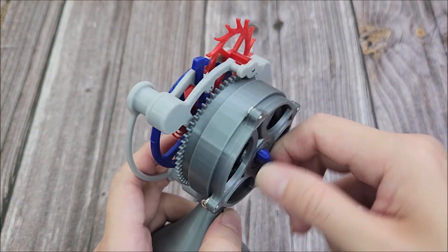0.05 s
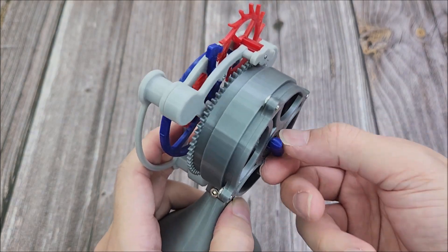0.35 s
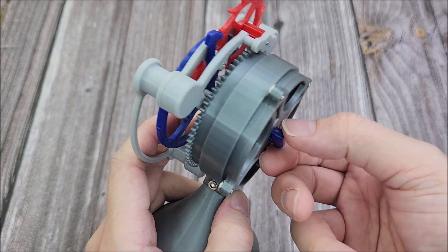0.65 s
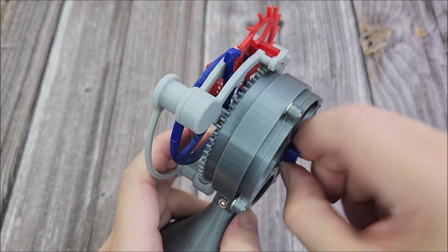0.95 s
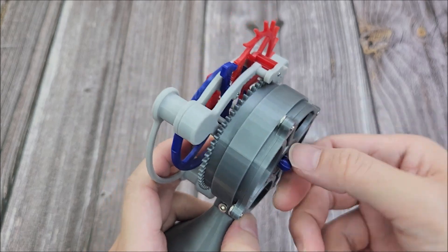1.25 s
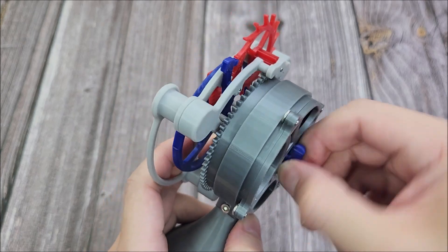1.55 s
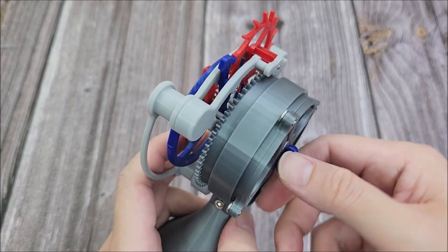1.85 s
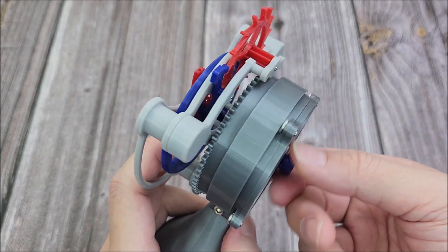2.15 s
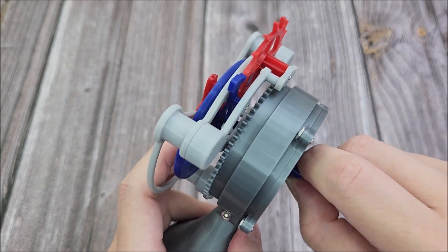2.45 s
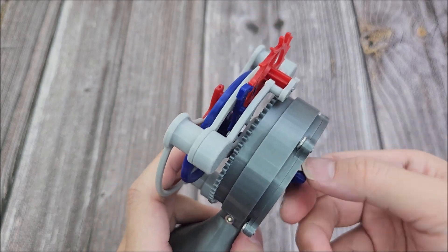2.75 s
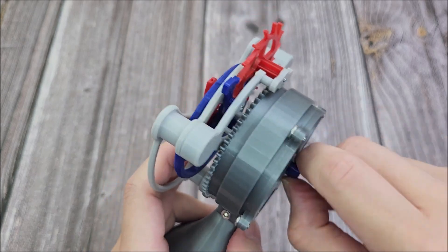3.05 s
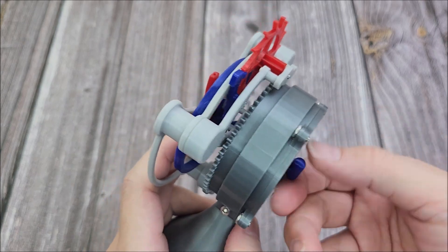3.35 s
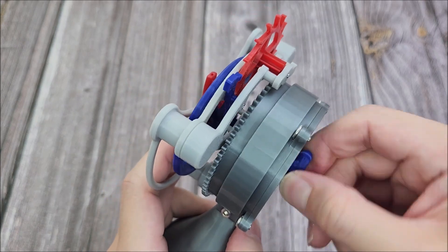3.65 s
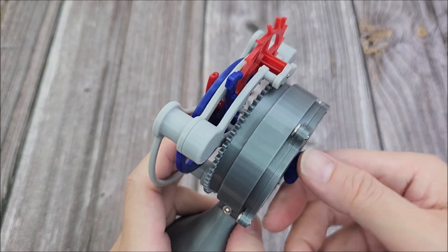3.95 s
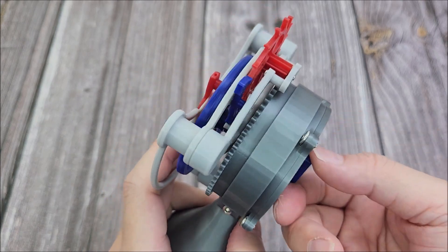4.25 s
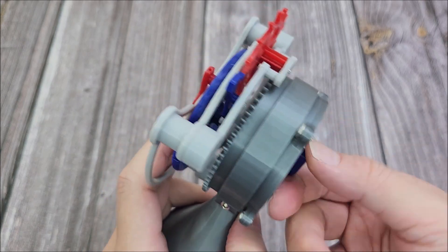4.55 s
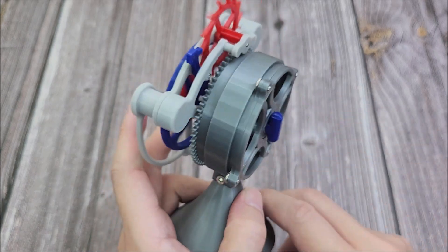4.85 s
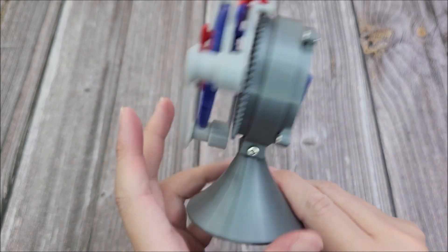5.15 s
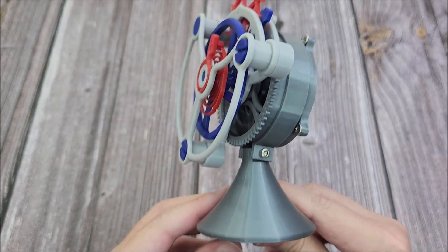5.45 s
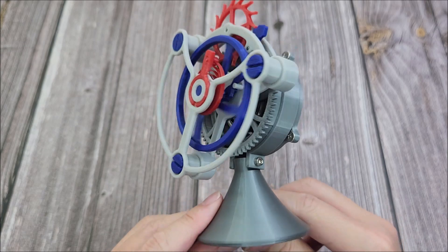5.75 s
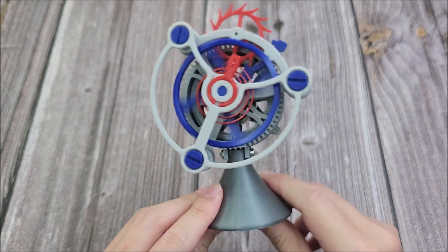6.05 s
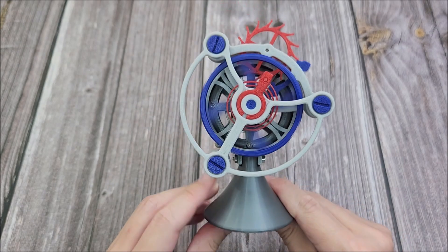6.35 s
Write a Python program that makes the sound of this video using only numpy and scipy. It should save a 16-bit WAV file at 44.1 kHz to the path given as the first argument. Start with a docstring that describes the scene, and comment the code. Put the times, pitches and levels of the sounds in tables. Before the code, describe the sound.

A small plastic clockwork model is wound in rasping ratchet bursts, then clicks free and ticks quickly and lightly in a quiet room.

```python
"""A quiet room, where a plastic model of a watch movement is held close and wound by hand.
Six pushes of the key drag a pawl over the ratchet teeth, amid finger rubs and small taps in the frame.
The key is let go and the pawl seats; the escapement starts with a hollow knock, then ticks four times
a second. Each contact is a scrape, snap and chatter of noise, coloured by the resonances of its part."""
import sys
import numpy as np
from scipy import signal
from scipy.fft import rfft, irfft, next_fast_len
from scipy.io import wavfile
from scipy.ndimage import uniform_filter1d, map_coordinates

SR = 44100
rng = np.random.default_rng(int(sys.argv[2]) if len(sys.argv) > 2 else 0)


def master_out(mix):
    """Clip the mix to full scale and print it as 16-bit PCM to the path in sys.argv[1]."""
    frames = np.transpose(np.atleast_2d(mix))
    ceiling = np.clip(frames, -1, 1)
    pcm = np.round(ceiling * 32767).astype(np.int16)
    wavfile.write(sys.argv[1], SR, pcm)


N = 281603
CUTOFF_HZ = 15900
FFT_SIZE = next_fast_len(N + SR, real=True)
HZ = np.maximum(np.arange(FFT_SIZE // 2 + 1) * SR / FFT_SIZE, 1)

# broad response of the ratchet wheel (frequency [Hz], gain [dB])
WHEEL_RESPONSE = [(50, -15), (110, -11), (250, -16.5), (700, -15.5), (1200, -17.5), (1700, -3), (2700, -6),
                  (3700, -3), (4700, 3), (6400, -1.5), (7600, 3.5), (12500, 3.5), (13900, 1), (15700, 2)]
# resonances of wheel and frame (frequency [Hz], width [Hz], gain [dB])
WHEEL_RESONANCES = [(1770, 50, -1), (2202, 250, 4.5), (2394, 63, 13), (2980, 41, 7), (3270, 180, 4),
                    (4640, 560, -8.5), (7300, 300, -3.5), (8840, 140, -8.5), (10170, 91, -4.5),
                    (11560, 100, -6), (15110, 220, -10.5)]
FRAME_RESONANCES = [(2253, 230, 14), (2820, 250, -1.5), (4200, 240, 2.5), (5730, 100, -6)]
# key travel, one list per push (time [s], teeth passed [count])
KEY_PUSHES = [
    [(.8498, 0), (.8773, 1), (.9144, 2), (.9443, 3), (.9627, 4), (1.0188, 9), (1.0478, 11), (1.0731, 12)],
    [(1.5164, 0), (1.5862, 2), (1.6052, 3), (1.6622, 8)],
    [(2.2368, 0), (2.2458, 1), (2.2587, 2), (2.2922, 3)],
    [(2.3591, 0), (2.4042, 3), (2.4307, 4), (2.4541, 5), (2.4918, 8), (2.5119, 9)],
    [(2.9121, 0), (2.9830, 2), (3.0068, 3), (3.0242, 4), (3.0985, 10)],
    [(3.6113, 0), (3.6818, 3), (3.7180, 5), (3.7372, 6), (3.8012, 9)],
]


def from_db(db):
    """Decibels to gain."""
    return 10 ** (np.asarray(db) / 20)


def at_hz(points, hz=HZ):
    """Read a table on a log-frequency axis."""
    points_hz, values = np.transpose(points)
    return np.interp(np.log(hz), np.log(points_hz), values)


def unit_energy(x):
    """Scale each channel to energy 1."""
    return x / np.sqrt(np.sum(x ** 2, axis=-1, keepdims=True) + 1e-20)


def add(out, start_s, piece):
    """Mix a piece in from start_s."""
    at = int(round(start_s * SR))
    piece = piece[:, max(-at, 0):max(N - at, 0)]
    out[:, max(at, 0):max(at, 0) + piece.shape[1]] += piece


def body(force, broad, modes):
    """Spectrum of a driven part: causal broad response times resonances, mean power gain 1."""
    cepstrum = irfft(np.log(from_db(at_hz(broad))), FFT_SIZE)
    cepstrum[1:FFT_SIZE // 2] *= 2
    cepstrum[FFT_SIZE // 2 + 1:] = 0
    peaks = 1 + sum(from_db(db) / (1 + 2j * (HZ - hz) / width_hz) for hz, width_hz, db in modes)
    response = np.exp(rfft(cepstrum)) * peaks
    rms_gain = np.sqrt(np.mean(np.abs(response[HZ < CUTOFF_HZ]) ** 2))
    return rfft(force, FFT_SIZE) * response / rms_gain


def spot_colour(force, depth_db=2.4, width_hz=600, corner_hz=2500):
    """Each contact spot favours other pitches: a smooth random ripple, deepest in the treble."""
    hz = np.arange(force.shape[1] // 2 + 1) * SR / force.shape[1]
    ripple = map_coordinates(rng.standard_normal(256), [hz / width_hz], order=3, mode="mirror")
    ripple_db = depth_db * ripple * hz / np.hypot(hz, corner_hz)
    return irfft(rfft(force) * from_db(ripple_db), force.shape[1])


def contacts(rows, gain_db, scrape_share, snap_share, chatter_s, chatter_db, split_hz):
    """Mid/side force: each contact scrapes up to a snap, then loose parts chatter."""
    out = np.zeros((2, N))
    lead_s, grit_db = 0.01, 2.5
    t = np.arange(next_fast_len(SR // 16, real=True)) / SR - lead_s
    before, after = np.minimum(t, 0), np.maximum(t, 0)
    lowpass = signal.butter(1, split_hz, fs=SR)
    for time_s, level_db, bright_db, pan_db, length_ms in rows:
        length_s = length_ms / 1000
        grit = uniform_filter1d(rng.standard_normal(len(t)), size=16)
        scrape = rng.standard_normal((2, len(t))) * np.exp(before / (scrape_share * length_s))
        scrape *= from_db(grit_db * grit / grit.std())
        snap = spot_colour(scrape * np.exp(-after / (snap_share * length_s)))
        chatter = from_db(chatter_db) * scrape * np.exp(-after / chatter_s)
        force = unit_energy(snap + chatter)
        # a harder contact trades bass for treble
        bass = signal.lfilter(*lowpass, force)
        force = bass * from_db(-bright_db / 2) + (force - bass) * from_db(bright_db / 2)
        # mid/side leakage pans it; positive is left
        force = force + np.tanh(np.log(from_db(pan_db / 2))) * force[::-1]
        add(out, time_s - lead_s, from_db(level_db + gain_db) * force)
    return out


def alike(rows, pan_db, length_ms):
    """Give contacts a common pan and length."""
    return [(*row, pan_db, length_ms) for row in rows]


def left_right(pair, correlation):
    """Blend unrelated mid and side spectra into left and right of a given correlation."""
    likeness = at_hz(correlation)
    mid = np.sqrt((1 + likeness) / 2) * pair[0]
    side = np.sqrt((1 - likeness) / 2) * pair[1]
    return np.array([mid + side, mid - side])


def still_room(rms_db=-58.5):
    """Low rumble and faint hiss of the room."""
    spectrum = [(20, -2), (34, 4), (50, -2), (115, -7.5), (170, -13), (290, -7), (450, -12), (800, -16),
                (2200, -22), (3400, -31.5), (4200, -30), (7300, -33), (10300, -42.5), (16000, -41)]  # room noise (frequency [Hz], level [dB])
    correlation = [(30, 1), (80, .88), (200, 0.8), (600, .45), (1500, 0.1), (8000, 0)]  # left with right (frequency [Hz], correlation [0-1])
    noise = left_right(rfft(rng.standard_normal((2, FFT_SIZE))), correlation)
    air = irfft(noise * from_db(at_hz(spectrum)), FFT_SIZE)[:, :N]
    return from_db(rms_db) * np.sqrt(N) * unit_energy(air)


def fading_turn(level_db=-51, t60_s=0.36):
    """The room still rings from a turn of the key just before the scene opens."""
    fade = from_db(level_db - 60 * np.arange(N) / SR / t60_s)
    return body(fade * rng.standard_normal((2, N)), WHEEL_RESPONSE, WHEEL_RESONANCES)


def frame_taps():
    """Small taps: handling, the pawl taking up or scraping a tooth, the lead-in to the first beat."""
    taps = [(0.0329, -36, -1), (0.7778, -43.5, 6), (1.7763, -37, 1.5), (2.2206, -32, 3),
            (2.2851, -24.5, 3.5), (2.8152, -43.5, -9), (3.1751, -36.5, -3.5), (3.34, -36, -4),
            (3.4994, -43.5, -0.5), (3.5645, -45.5, 1.5), (3.8803, -42.5, 18), (3.9081, -36, -8.5),
            (4.4992, -35, -7), (4.5855, -43.5, 10), (4.6503, -39, -15), (4.8181, -43, 8)]  # (time [s], level [dB], brightness [dB])
    response = [(100, -6), (1200, -16.5), (2400, -5), (5000, 4.5), (8000, 2), (12000, -5.5), (16000, -0.5)]  # frame (frequency [Hz], gain [dB])
    force = contacts(alike(taps, pan_db=0.5, length_ms=1.8), gain_db=14.5, scrape_share=0.23,
                     snap_share=0.85, chatter_s=0.006, chatter_db=-23.5, split_hz=4000)
    return body(force, response, FRAME_RESONANCES)


def finger_rubs(gain_db=-5.5, grains_per_s=3600, spread_db=1.5):
    """Skin catches on ridges of the plastic: swells of tiny uneven slips."""
    rubs = [(0.444, 0.04, -53.5), (0.498, .045, -39), (0.541, 0.042, -55), (1.784, 0.019, -49.5),
            (2.027, 0.0634, -50), (2.652, 0.022, -53.5), (2.731, 0.053, -56), (3.468, 0.055, -48),
            (3.88, 0.059, -45.5), (3.998, 0.062, -58.5)]  # (time [s], length [s], level [dB])
    response = [(100, -6), (1200, -3.5), (2400, -4), (3500, -0.5), (5800, -0.5), (8000, -4), (16000, -15)]  # skin on plastic (frequency [Hz], gain [dB])
    take_up_s, take_up_db = 0.025, -52.5  # a rub leads into every push
    take_ups = [(push[0][0] - take_up_s, take_up_s, take_up_db) for push in KEY_PUSHES]
    force, longest = np.zeros((2, N)), SR // 8
    for time_s, length_s, level_db in rubs + take_ups:
        slipping = rng.random(longest) < grains_per_s / SR
        sizes = from_db(spread_db * rng.standard_normal(longest))
        grains = slipping * sizes * rng.standard_normal((2, longest))
        n = int(length_s * SR)
        swell = unit_energy(grains[:, :n] * np.sqrt(np.hanning(n)))
        add(force, time_s, from_db(level_db + gain_db) * np.sqrt(n) * swell)
    return body(force, response, FRAME_RESONANCES)


def key_creak():
    """The key sticks and slips under the fingers when first gripped."""
    slips = [(.4915, -38.5, 0.5, 2, 1), (.4965, -37, -9.5, -7, 0.96), (.5003, -29.5, -2.5, 1.5, 0.71),
             (.5062, -28, -4.5, 5.5, 0.38)]  # (time [s], level [dB], brightness [dB], pan [dB], length [ms])
    response = [(100, 3.5), (1200, -7.5), (2500, 2.5), (6000, 2.5), (16000, -22)]  # key (frequency [Hz], gain [dB])
    modes = [(2070, 81, 24), (2120, 110, 20)]  # (frequency [Hz], width [Hz], gain [dB])
    force = contacts(slips, gain_db=16.5, scrape_share=0.28, snap_share=1.0,
                     chatter_s=0.0056, chatter_db=-12.5, split_hz=3500)
    return body(force, response, modes)


def pin_clicks():
    """A light pin clicks in its hole with a short, high ring."""
    clicks = [(.729, -52.5, 0), (4.7478, -25, -1), (4.7998, -34, 7)]  # (time [s], level [dB], brightness [dB])
    response = [(100, -7.5), (2000, -20.5), (4500, 6), (7000, -6.5), (10000, -6), (16000, -9)]  # pin (frequency [Hz], gain [dB])
    modes = [(4900, 690, 13)]  # (frequency [Hz], width [Hz], gain [dB])
    force = contacts(alike(clicks, pan_db=3.5, length_ms=0.7), gain_db=14.5, scrape_share=0.18,
                     snap_share=0.91, chatter_s=0.003, chatter_db=-30, split_hz=5000)
    return body(force, response, modes)


def ratchet(dulling_db=1, length_ms=2.6):
    """The pawl drops once per tooth of key travel; its spring makes the snaps nearly equal."""
    grips_db = [-1.5, -1, -2, 3.5, -1, 1]  # grip of each push (brightness [dB])
    drops = []
    for grip_db, push in zip(grips_db, KEY_PUSHES):
        times_s, passed = np.transpose(push)
        for tooth in np.arange(passed[-1] + 1):
            scatter_db, colour_db, pan_db = rng.normal(0, [0.7, 0.5, 3])
            progress = tooth / passed[-1]
            bright_db = grip_db - dulling_db * (progress - 0.5) - colour_db  # the grip tightens
            level_db = scatter_db - 0.24 * bright_db  # duller teeth are louder
            drops.append((np.interp(tooth, passed, times_s), level_db, bright_db, pan_db, length_ms))
    force = contacts(drops, gain_db=3, scrape_share=0.44, snap_share=0.49,
                     chatter_s=0.011, chatter_db=-15.5, split_hz=2500)
    return body(force, WHEEL_RESPONSE, WHEEL_RESONANCES)


def barrel_knock():
    """The spring barrel knocks in its play."""
    clacks = [(1.5612, -4, 1.5, -4.5, 0.76), (1.5638, -11.5, -5, 3.5, 3.6)]  # (time [s], level [dB], brightness [dB], pan [dB], length [ms])
    response = [(100, -13), (700, -19), (1300, -11.5), (2000, -5), (4000, 0.5), (6500, -7.5), (11000, -7),
                (16000, -15.5)]  # barrel (frequency [Hz], gain [dB])
    modes = [(1117, 56, -1), (2100, 130, 4.6), (2325, 56, 16), (2973, 70, 11), (4053, 100, 2),
             (4400, 160, 7.3), (4930, 90, 5), (5470, 140, 7)]  # (frequency [Hz], width [Hz], gain [dB])
    force = contacts(clacks, gain_db=15.5, scrape_share=0.033, snap_share=0.3,
                     chatter_s=0.0067, chatter_db=-26.5, split_hz=5000)
    return body(force, response, modes)


def pawl_release():
    """With the key let go, the pawl seats with a dry double snap."""
    snaps = [(4.5178, -19.5, -4, -2.5, 0.44), (4.5195, -12, 6, -0.5, 3.8)]  # (time [s], level [dB], brightness [dB], pan [dB], length [ms])
    response = [(200, -15), (1200, -13), (1700, -4), (3100, -1.5), (4500, 3), (6500, 0), (7500, 7),
                (11000, 1), (16000, 0.5)]  # unloaded pawl (frequency [Hz], gain [dB])
    modes = [(2170, 220, 3.5), (3300, 300, 0.5)]  # (frequency [Hz], width [Hz], gain [dB])
    force = contacts(snaps, gain_db=14.5, scrape_share=0.35, snap_share=0.47,
                     chatter_s=0.0079, chatter_db=-18.5, split_hz=3000)
    return body(force, response, modes)


def hollow_knocks():
    """The escapement's first beat lands with a hollow knock; a faint knock follows later."""
    knocks = [(4.6909, -21.5, 2), (5.2985, -46.5, -17)]  # (time [s], level [dB], brightness [dB])
    response = [(100, -9.5), (600, -2.5), (1500, -5), (3000, 0), (6000, 2.5), (9000, 2.5), (16000, -5)]  # (frequency [Hz], gain [dB])
    modes = [(1100, 160, 4), (1690, 73, 13.5), (2250, 270, 17.5), (3370, 99, 10), (4400, 230, 9),
             (5740, 580, -1)]  # (frequency [Hz], width [Hz], gain [dB])
    force = contacts(alike(knocks, pan_db=0, length_ms=5.9), gain_db=15.5, scrape_share=0.16,
                     snap_share=0.56, chatter_s=0.0064, chatter_db=-24.5, split_hz=4000)
    return body(force, response, modes)


def escapement(unlock_lead_s=0.016, usual_lead_s=0.023, bright_db_per_s=800):
    """Three contacts a beat: the lever unlocks, takes its impulse, and the escape wheel lands."""
    beats = [(4.9313, -19, -3.5, .0296), (5.1859, -20, -2, .0363), (5.4311, -18.5, -1, 0.02),
             (5.687, -23.5, 3.5, .025), (5.9393, -19.5, 2.5, .0138), (6.1956, -23, 1, .0199)]  # (landing [s], level [dB], brightness [dB], impulse lead [s])
    response = [(50, -11), (120, -3), (250, -13), (700, -6.5), (1600, -8.5), (2500, -4), (4000, 1),
                (6000, 1.5), (7200, 0.5), (10500, -4), (13000, -5), (16000, -7)]  # escapement (frequency [Hz], gain [dB])
    modes = [(2324, 160, 5.5), (2890, 260, 3), (3060, 340, 1), (4530, 290, -4.5), (6100, 300, -4),
             (11860, 500, -3)]  # (frequency [Hz], width [Hz], gain [dB])
    strikes = []  # (time [s], level [dB], brightness [dB], pan [dB], length [ms])
    for landing_s, level_db, bright_db, lead_s in beats:
        impulse_s = landing_s - lead_s
        swing_db = bright_db_per_s * (usual_lead_s - lead_s)  # a quicker swing strikes brighter
        strikes += [(impulse_s - unlock_lead_s, -47, -7, 0, 3.03),
                    (impulse_s, -31.5, swing_db, -0.5, 2.8),
                    (landing_s, level_db, bright_db, 1.1, 1.27)]
    force = contacts(strikes, gain_db=14.5, scrape_share=0.74, snap_share=0.83,
                     chatter_s=0.021, chatter_db=-17, split_hz=6100)
    return body(force, response, modes)


def placed(pair, lag_ms):
    """Sound reaches the right microphone later and with another colour."""
    balance = [(200, -1.5), (900, 8), (1750, 4.5), (2400, 4), (3000, 5.5), (5500, 0), (7800, 0),
               (10500, 0.5), (13000, -.5), (15500, 4.5)]  # (frequency [Hz], left minus right [dB])
    correlation = [(200, 0.96), (2200, 0.86), (3200, 0.58), (6000, 0.12), (10000, 0.12), (15000, .2)]  # left with right (frequency [Hz], correlation [0-1])
    gains = from_db(at_hz(balance) * np.array([[0.5], [-0.5]]))
    delay = np.exp(-2j * np.pi * HZ * np.array([[0], [lag_ms]]) / 1000)
    return left_right(pair, correlation) * gains * delay


def room(early_db=-5.5, early_s=0.011, table_s=0.0014, tail_db=-18, build_s=0.0024):
    """Direct sound, quick reflections from hands and table, then a tail whose treble dies first."""
    decay = [(300, 1), (2500, 0.34), (7000, 0.33), (11000, 0.47), (16000, 0.21)]  # reverberation (frequency [Hz], T60 [s])
    t = np.arange(SR * 3 // 4) / SR
    early = unit_energy(rng.standard_normal((2, len(t))) * (t > table_s) * np.exp(-t / early_s))
    tail = 0
    edges_hz = np.geomspace(100, 17000, 12)
    for low_hz, high_hz in zip(edges_hz, edges_hz[1:]):
        bandpass = signal.butter(2, [low_hz, high_hz], "band", fs=SR, output="sos")
        band = signal.sosfilt(bandpass, rng.standard_normal((2, len(t))))
        tail = tail + band * from_db(-60 * t / at_hz(decay, np.sqrt(low_hz * high_hz)))
    tail = unit_energy(tail * (1 - np.exp(-t / build_s)))
    return 1 + rfft(from_db(early_db) * early + from_db(tail_db) * tail, FFT_SIZE)


def scene():
    """The model sits a little left of the microphones."""
    winding = ratchet() + barrel_knock() + key_creak() + fading_turn()
    movement = winding + pawl_release() + escapement() + frame_taps() + hollow_knocks()
    model = placed(movement + finger_rubs(), lag_ms=0.076) + placed(pin_clicks(), lag_ms=0.01)
    return irfft(model * room(), FFT_SIZE)[:, :N] + still_room()


def record(dry):
    """Steep low-pass."""
    return signal.sosfilt(signal.ellip(12, 0.2, 70, CUTOFF_HZ, fs=SR, output="sos"), dry)


dry = scene()
out = record(dry)
master_out(out)
```